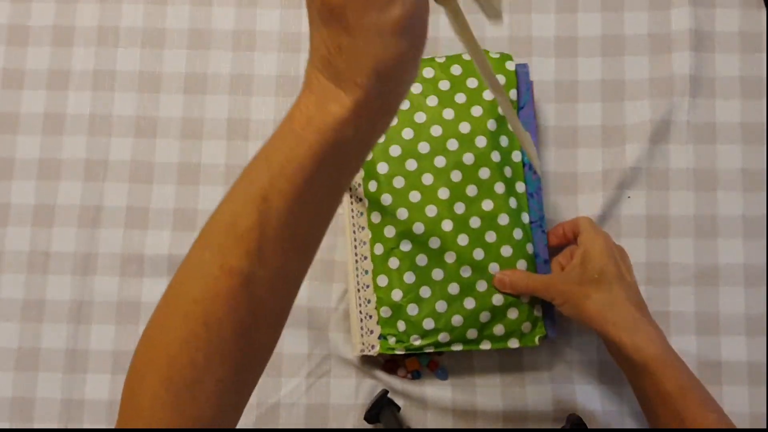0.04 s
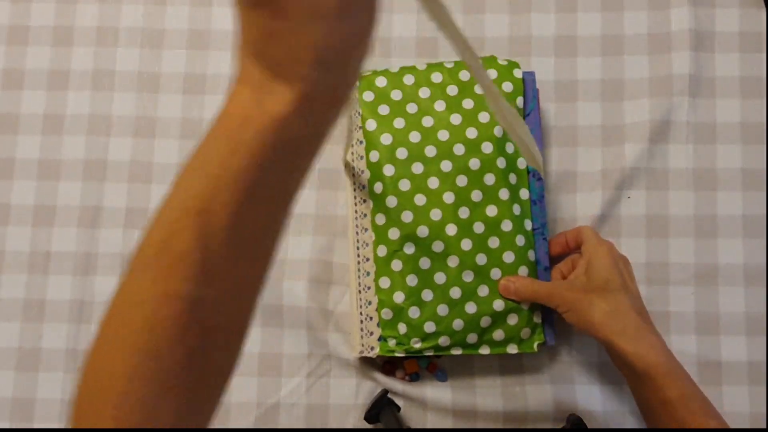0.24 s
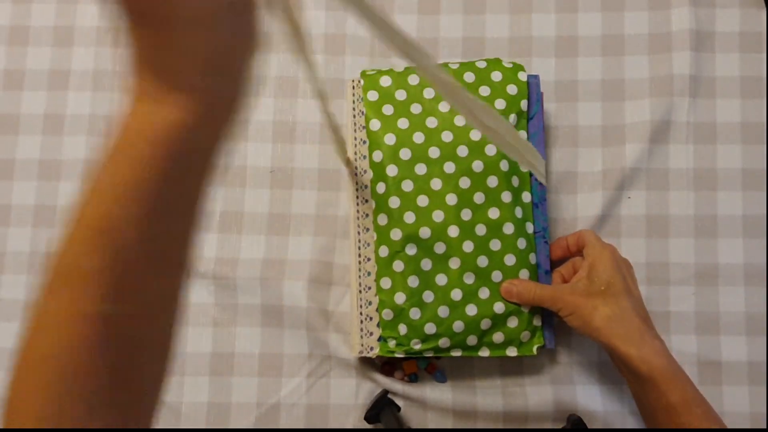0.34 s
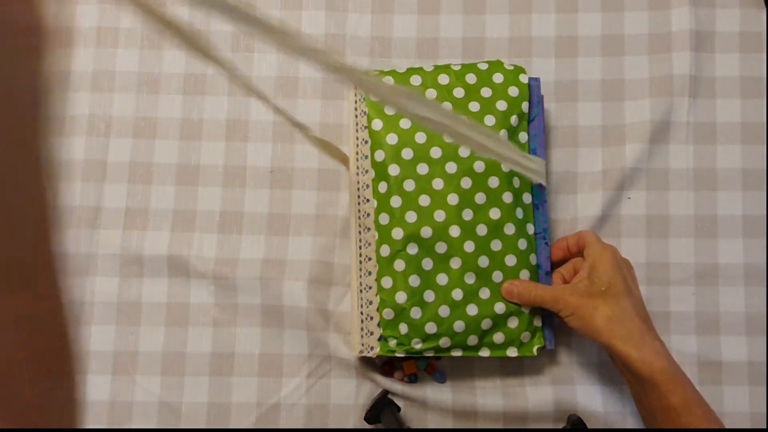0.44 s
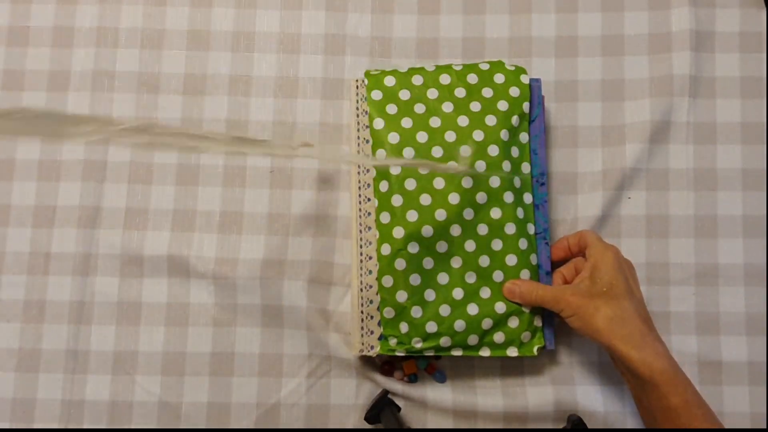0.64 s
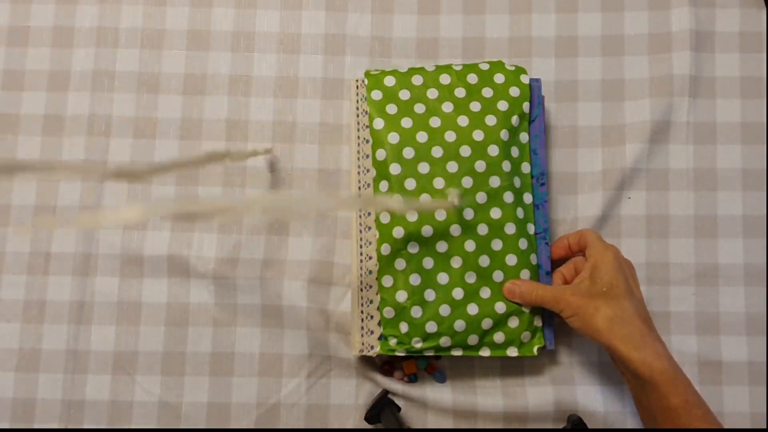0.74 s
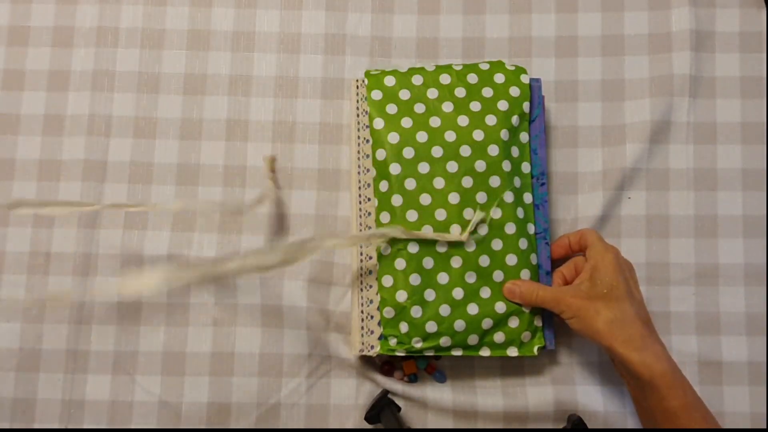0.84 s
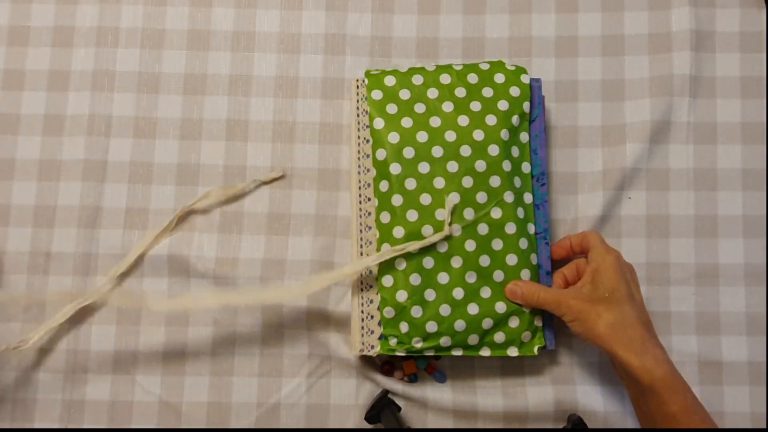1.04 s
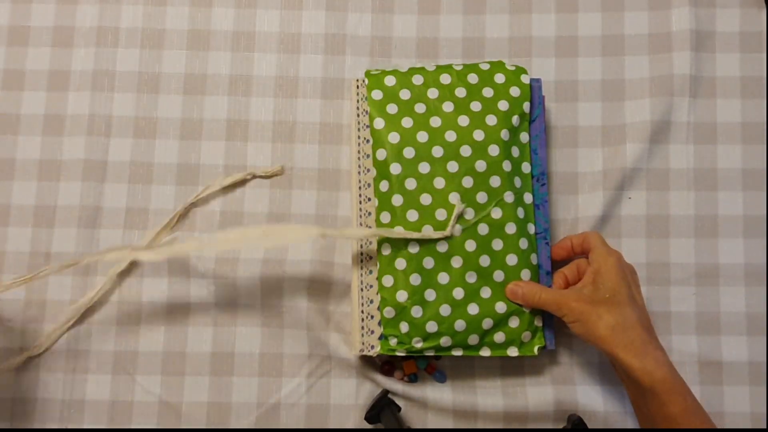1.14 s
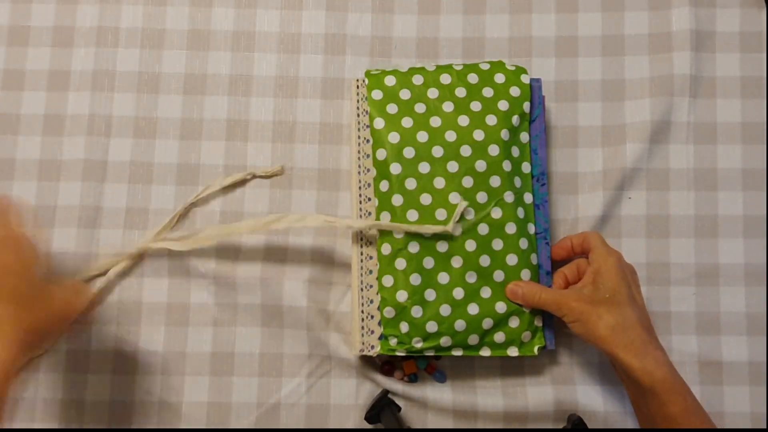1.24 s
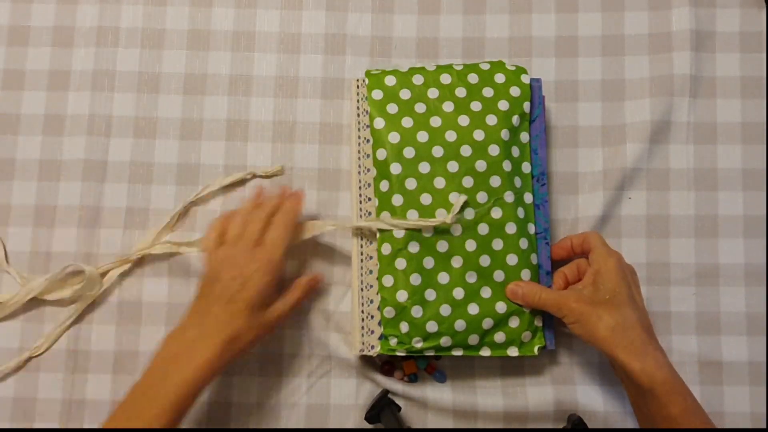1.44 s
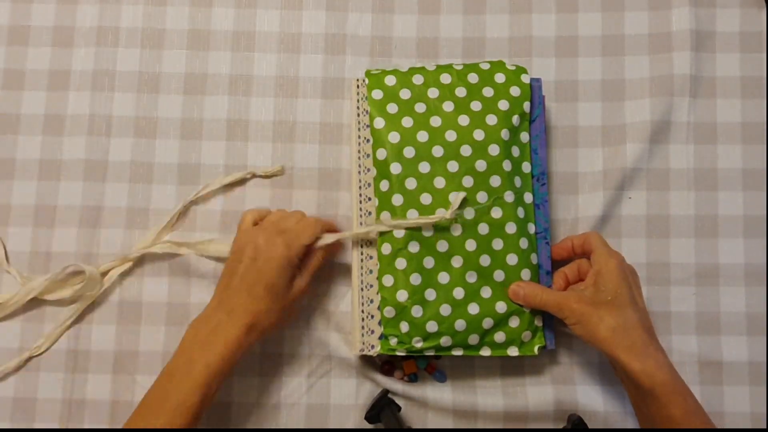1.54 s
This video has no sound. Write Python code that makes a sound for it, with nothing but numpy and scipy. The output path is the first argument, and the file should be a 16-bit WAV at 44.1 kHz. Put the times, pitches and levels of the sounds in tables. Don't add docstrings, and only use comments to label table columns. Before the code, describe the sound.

Ribbon pulled from under a cloth-covered book, close in stereo. A small tick comes at 0.02 s, then dry, crisp fibre rasps from about 0.2 s, quickening into a dense zip with low table thuds until 0.57 s. A dull knock and bright flick end it near 0.55-0.6 s. Faint ticks and brushes follow from 0.8 s; a soft palm thump lands at 1.56 s over low room rumble and hum.

```python
import sys
import numpy as np
from scipy import signal
from scipy.fft import rfft, irfft, next_fast_len
from scipy.io import wavfile
from scipy.ndimage import uniform_filter1d, map_coordinates

SR = 44100
rng = np.random.default_rng(int(sys.argv[2]) if len(sys.argv) > 2 else 0)


def voltage_ratio(level):
    return 10 ** (np.asarray(level, float) / 20)


def materialize(psi):
    bounded = np.clip(np.atleast_2d(psi).T, -1, 1)
    quanta = np.round(bounded * 32767).astype(np.int16)
    wavfile.write(sys.argv[1], SR, quanta)


N = 70560
T = np.arange(N) / SR

# (frequency [Hz], density [dB per Hz])
ROOM_SPECTRUM = [(25, -20.5), (50, -7.5), (78, -9.5), (104, -19), (150, -16), (300, -18), (446, -25),
                 (633, -38.5), (4900, -48), (15600, -51.5)]
# (frequency [Hz], left-right likeness [0-1])
ROOM_LIKENESS = [(60, 0.81), (240, 0.87), (950, 0.035), (3770, 0.098), (15000, 0.03)]
# (time [s], level [dB], brightness [dB])
DRAG_COURSE = [(0, -50, -8), (0.052, -55, -31), (0.088, -60.5, -15), (0.143, -56.5, -10.5),
               (0.169, -44, -16), (.2, -44.5, -10.5), (0.239, -41, 1), (0.279, -45, 3.5),
               (0.329, -46.5, 6.5), (0.448, -42.5, 9), (.52, -45.5, 1.5), (0.556, -38, 0.5),
               (.578, -46.5, -1), (0.611, -53, -5.5), (.68, -65.5, -29)]
# (centre [s], peak level [dB], length [s], push on the table [dB])
SLIP_EVENTS = [(0.155, -41.5, 0.004, -55), (.176, -51.5, 0.0074, -71), (0.189, -48, 0.0068, -64.5),
               (0.166, -45.5, 0.012, -66), (0.177, -52.5, 0.0084, -53), (0.1983, -50, 0.025, -54),
               (.216, -22, 0.03, -41), (0.2278, -28.5, 0.027, -67), (0.2385, -44, 0.016, -37.5),
               (0.256, -34.5, 0.0057, -44), (0.3, -22.5, 0.03, -45), (0.308, -23.5, 0.021, -74),
               (0.331, -36, 0.0073, -66), (0.337, -26.5, 0.015, -38.5), (0.3701, -24.5, 0.018, -71),
               (0.38, -27.5, 0.01, -37.5), (0.399, -32.5, 0.018, -35), (0.413, -34, 0.0058, -53.5),
               (0.42, -21, 0.011, -38), (0.4334, -25.5, 0.0063, -32.5), (0.4426, -32, 0.0051, -42),
               (0.4563, -26.5, 0.018, -39.5), (0.466, -25, 0.0083, -44), (0.4761, -21, 0.002, -33.5),
               (0.489, -21.5, 0.0057, -31), (0.4956, -25, 0.023, -29.5), (0.5063, -26.5, 0.018, -31),
               (0.5143, -22.5, 0.0083, -28), (0.522, -26, 0.015, -45), (0.528, -37.5, 0.008, -46),
               (0.534, -25.5, 0.025, -49.5), (0.5443, -23, 0.019, -38.5), (0.559, -37.5, .01, -65),
               (0.567, -43, 0.008, -66)]
# (frequency [Hz], density [dB per Hz])
SILK_SPECTRUM = [(150, -1), (300, -24), (600, -9), (1000, -3), (2200, -1.5), (4500, -2.5), (7000, 1),
                 (15600, -6.5)]
# (frequency [Hz], density [dB per Hz])
CRACKLE_SPECTRUM = [(200, -21), (500, -6.5), (1130, 2), (2250, -8), (3000, -3), (5880, -0.5), (9000, 1.5),
                    (13500, 0), (15600, -3)]
# (frequency [Hz], gain [dB])
LATE_DULLING = [(3000, 1), (7000, -8.5), (9000, -3), (15600, -7)]
# (frequency [Hz], left-right likeness [0-1])
RUSTLE_LIKENESS = [(100, 0.92), (600, 1), (1500, 0.68), (6000, 0.52), (14000, 0.67)]
# (time [s], peak level [dB], centre [Hz], decay [cycles])
TICK_EVENTS = [(0.0179, -25.5, 950, 3), (.0177, -33.5, 4400, 6), (.0292, -39, 6200, 15),
               (.025, -38.5, 2020, 9.9), (0.0216, -43, 1380, 7), (0.0234, -38, 1140, 2.4),
               (.029, -33.5, 2280, 11), (.0305, -41, 2000, 16), (0.037, -40.5, 1150, 5.3),
               (0.1556, -48, 1200, 5), (0.1704, -44, 650, 5), (0.1782, -41, 1000, 6), (.193, -47, 800, 5),
               (.1965, -41, 560, 18), (0.201, -44.5, 386, 12), (.209, -35, 1250, 6), (.257, -30.5, 1500, 6),
               (.302, -45.5, 363, 28), (0.2205, -27.5, 1050, 8), (0.7803, -56.5, 4200, 11),
               (.8945, -47.5, 3570, 8.3), (.8946, -51, 4950, 5), (.8947, -52.5, 2300, 3),
               (.8947, -59, 6900, 6.7), (.9228, -58.5, 3030, 6.9), (.923, -60.5, 6500, 5),
               (1.194, -57, 3600, 9), (1.2305, -59, 7500, 5), (1.259, -63.5, 4800, 5),
               (1.331, -59, 3980, 5), (1.442, -60.5, 5000, 3.6)]
# (time [s], peak level [dB], centre [Hz], decay [cycles])
SNAP_EVENTS = [
    (.588, -29, 2250, 14),
    (.5878, -32, 4150, 18),
    (.588, -37, 6300, 12),
    (.591, -33, 1100, 7),
    (1.1115, -52, 6500, 9),
    (1.1117, -57, 3000, 4),
]
# (time [s], level
# [dB], rise [s], t60 [s], low edge [Hz])
BRUSH_EVENTS = [(0.02, -44, 0.008, 0.09, 490), (0.782, -71, 0.0049, 0.18, 3300),
                (0.807, -67, 0.0078, 0.24, 2840), (0.895, -69.5, 0.0015, 0.21, 1110),
                (1.0, -69.5, 0.034, 0.34, 2560), (1.112, -66, 0.0033, 0.53, 2160),
                (1.151, -61, 0.042, 0.19, 2660), (1.241, -75, 0.011, 0.36, 3280),
                (1.33, -80.5, 0.02, 0.88, 3370), (1.555, -57, 0.01, 0.76, 299),
                (1.583, -62.5, 0.027, 0.4, 910), (.923, -70, 0.0038, 0.23, 2480),
                (1.255, -72, 0.0057, 0.17, 3800)]
# (frequency [Hz], density [dB per Hz])
BRUSH_SPECTRUM = [(300, 34.5), (2000, -4), (5000, -1.5), (7000, -2.5), (8500, -4.5), (11000, -16.5),
                  (15000, -25)]
# (time [s], level [dB], rise [s], t60 [s], centre [Hz], width [Hz])
THIN_RING = (.6, -64, .02, .65, 1880, 160)
# (centre [Hz], width [Hz], level [dB])
TABLE_MODES = [(87.7, 6.2, -0.5), (115.1, 8.9, 1.5), (188.7, 9.3, 5)]
# (time [s], level [dB], frequency [Hz], t60 [s])
KNOCK_EVENTS = [
    (.543, -36, 385, .06),
    (.542, -43, 550, .05),
    (.03, -61, 188, .5),
]
# (frequency [Hz], t60 [s])
WALL_T60 = [(200, 0.62), (1900, 0.28), (5000, 0.28), (14000, 0.37)]
# (frequency [Hz], gain [dB])
WALL_GAIN = [(200, -3), (1000, 1), (4000, 2.5), (14000, -1)]
# (time [s], level [dB], softness [s])
HAND_EVENTS = [
    (1.5559, -46, 0.0014),
    (1.566, -56.5, 0.0017),
    (1.57, -59, 0.0039),
    (1.577, -57.5, 0.002),
    (1.582, -53, 0.0031),
    (1.586, -59, 0.0011),
    (1.595, -60, 0.0019),
    (1.59, -43.5, 0.003),
]
# (centre [Hz], width [Hz], level [dB])
PALM_MODES = [(57, 15, 9.5), (110.4, 25.5, 3), (187.7, 71, 8), (476, 430, 0), (690, 330, -12.5)]
# (frequency [Hz], phase by which left leads [rad])
PORT_LEAD = [(100, 0), (1800, -.5), (4100, -1), (5000, -1.8), (7000, -3), (11200, -4.1)]
# (frequency [Hz], left minus right [dB])
PORT_LEVEL = [(60, 1), (240, 0), (950, 2.0), (3770, 2.5), (15000, 4.5)]
# (frequency [Hz], gain [dB])
MIC_RESPONSE = [(22, -22.5), (45, 0), (6900, 2.5), (7500, -3.5), (15000, -1)]

ROOM_DB, MAINS_HZ, MAINS_DB = -58, 49, -59
SHAKE_DB, SHAKE_HZ = -10, 50.7
PUSH_DB, PUSH_S, PUSH_LAG_S = 19, 0.0018, -0.0045
CLUMP_DB, CLUMP_BINS, CLUMP_FRAMES = 3, 14, 2
TICK_T60_S, TICK_CRACK_GAIN = 0.019, 0.34
TABLE_HZ, TABLE_WIDTH_HZ = 104, 60
ENDS_LEAD_SHARE = 0.3
WET_DB = -10
TOP_HZ = 15750


def unit(x):
    return x / np.sqrt(np.mean(x ** 2) + 1e-20)


def along(points, hz):
    f, v = np.transpose(points)
    return np.interp(np.log(hz + 1), np.log(f + 1), v)


def filtered(x, response):
    m = next_fast_len(N + SR // 2)
    return irfft(rfft(x, m) * response(np.fft.rfftfreq(m, 1 / SR)), m)[..., :N]


def modes(table):
    return lambda f: sum(voltage_ratio(db) * 1j * f * w / (c * c - f * f + 1j * f * w) for c, w, db in table)


def swell(s, rise_s, t60_s):
    u = np.maximum(T - s, 0)
    return (1 - np.exp(-u / rise_s)) * voltage_ratio(-60 * u / t60_s)


def ping(s, hz):
    return np.sin(2 * np.pi * hz * (T - s))


def grains(spectrum, spiky_db, alike):
    size = voltage_ratio(spiky_db * unit(uniform_filter1d(rng.standard_normal(N), size=12)))

    def colour(hz):
        turn = np.arccos(np.clip(along(alike, hz), -1, 1)) / 2
        return voltage_ratio(along(spectrum, hz)) * (hz > 20) * np.array([np.cos(turn), np.sin(turn)])

    mid, side = filtered(size * rng.standard_normal((2, N)), colour)
    return unit(np.array([mid + side, mid - side]))


def clumped(x):
    z = signal.stft(x, nperseg=256)[2]
    field = uniform_filter1d(rng.standard_normal(z.shape[1:]), CLUMP_BINS, axis=0)
    field = uniform_filter1d(field, CLUMP_FRAMES, axis=1)
    return unit(signal.istft(z * voltage_ratio(CLUMP_DB * unit(field)), nperseg=256)[1][:, :N])


def room():
    drift_db = 0.5 * map_coordinates(rng.standard_normal(20), [T * 9])
    hum = voltage_ratio(MAINS_DB + drift_db) * np.sin(2 * np.pi * MAINS_HZ * T)
    return voltage_ratio(ROOM_DB - 6) * grains(ROOM_SPECTRUM, 1, ROOM_LIKENESS) + hum


def ribbon_drag():
    s, level_db, bright_db = np.transpose(DRAG_COURSE)
    level = voltage_ratio(np.interp(T, np.r_[s, s[-1] + 0.08], np.r_[level_db, -110]))
    silk = voltage_ratio(np.interp(T, s, bright_db)) * clumped(grains(SILK_SPECTRUM, 3.1, RUSTLE_LIKENESS))
    dull = [(150, 1), (550, 2), (1300, -2), (3000, -5), (15000, -21)]  # (Hz, dB per Hz)
    cloth = 0.67 * grains(dull, 3.3, RUSTLE_LIKENESS)
    shake = unit(filtered(rng.standard_normal(N), modes([(SHAKE_HZ, 25, 0)])))
    return level * (silk + cloth + voltage_ratio(SHAKE_DB) * shake)


def ribbon_slips():
    puffs, push = np.zeros(N), np.zeros(N)
    for s, db, length_s, push_db in SLIP_EVENTS:
        puffs += voltage_ratio(db - 9) * np.cos(np.pi * np.clip((T - s) / length_s, -0.5, 0.5)) ** 2
        push += voltage_ratio(push_db + PUSH_DB) * np.exp(-((T - s - PUSH_LAG_S) / PUSH_S) ** 2)
    silk = clumped(grains(SILK_SPECTRUM, 3.3, RUSTLE_LIKENESS))
    late = np.clip((T - 0.47) / 0.027, 0, 1)
    silk = (1 - late) * silk + late * filtered(silk, lambda hz: voltage_ratio(along(LATE_DULLING, hz)))
    early = np.clip((0.345 - T) / 0.045, 0, 1) * (T > 0.2)
    crackle = grains(CRACKLE_SPECTRUM, 1.3, RUSTLE_LIKENESS)
    return puffs * (early * crackle + (1 - early) * silk), push


def ticks():
    out = np.zeros((2, N))
    for s, db, hz, cycles in [*TICK_EVENTS, *SNAP_EVENTS]:
        out += voltage_ratio(db) * swell(s, 0.18 / hz, cycles / hz) * ping(s, hz)
        around = [(hz / 3, -20), (hz, 0), (2 * hz, -8), (4 * hz, -26), (9 * hz, -40)]
        crack = grains(around, 2, RUSTLE_LIKENESS)
        out += TICK_CRACK_GAIN * voltage_ratio(db) * swell(s, 0.0003, TICK_T60_S) * crack
    return out


def brushes():
    out = np.zeros((2, N))
    for s, db, rise_s, t60_s, hz in BRUSH_EVENTS:
        cut = [(hz * 0.93, -30), (hz, along(BRUSH_SPECTRUM, hz))] + [p for p in BRUSH_SPECTRUM if p[0] > hz]
        out += voltage_ratio(db) * swell(s, rise_s, t60_s) * grains(cut, 2.5, RUSTLE_LIKENESS)
    return out


def table(push):
    radiation = modes([(TABLE_HZ, TABLE_WIDTH_HZ, 0)])
    out = filtered(push, lambda f: modes(TABLE_MODES)(f) * radiation(f) ** 2)
    for s, db, hz, t60_s in KNOCK_EVENTS:
        out += voltage_ratio(db) * swell(s, 0.0012, t60_s) * ping(s, hz)
    return out


def walls(x):
    hz, t, z = signal.stft(rng.standard_normal((2, SR // 2)), SR, nperseg=256)
    decay_db = along(WALL_GAIN, hz)[:, None] - 60 * t / along(WALL_T60, hz)[:, None]
    tail = signal.istft(z * voltage_ratio(decay_db), SR, nperseg=256)[1]
    delayed = np.pad(x, (400, 0))[None]
    return signal.fftconvolve(delayed, tail / np.linalg.norm(tail[0]), axes=1)[:, :N]


def thin_ring():
    s, db, rise_s, t60_s, hz, width_hz = THIN_RING
    return voltage_ratio(db) * swell(s, rise_s, t60_s) * unit(filtered(rng.standard_normal(N), modes([(hz, width_hz, 0)])))


def hand():
    push = sum(voltage_ratio(db + 8.5) * np.exp(-((T - s) / soft_s) ** 2) for s, db, soft_s in HAND_EVENTS)
    return filtered(push, modes(PALM_MODES))


def at_ports(x, lead_share):
    def response(hz):
        return np.array([voltage_ratio(k * along(PORT_LEVEL, hz)) * np.exp(1j * k * lead_share * along(PORT_LEAD, hz))
                         for k in (0.5, -0.5)])
    return filtered(x, response)


def scene():
    slips, push = ribbon_slips()
    loose = ticks() + brushes() + thin_ring()
    loose = loose * voltage_ratio(np.outer([1, -1], np.clip(3.9 * (T - 0.6), 0, 1.6)))
    near = ribbon_drag() + slips + loose
    fallen = loose * (T > 0.7)
    direct = at_ports(near - fallen, 1) + at_ports(fallen, ENDS_LEAD_SHARE)
    low = (table(push) + hand()) * voltage_ratio([[0.3], [-0.3]])
    return direct + voltage_ratio(WET_DB) * walls(near[0]) + low + room()


def band_limit(x):
    return signal.sosfilt(signal.butter(12, 15750, fs=SR, output="sos"), x)


def record(dry):
    mix = filtered(dry, lambda hz: voltage_ratio(along(MIC_RESPONSE, hz)) * (hz < TOP_HZ))
    return band_limit(mix)


dry = scene()
out = record(dry)
materialize(out)
```